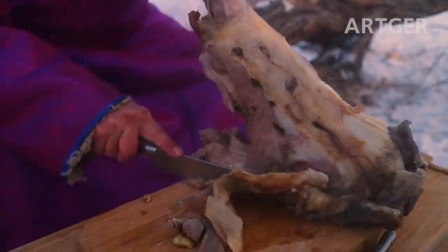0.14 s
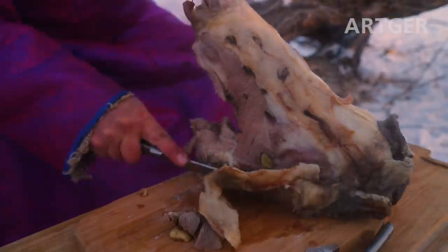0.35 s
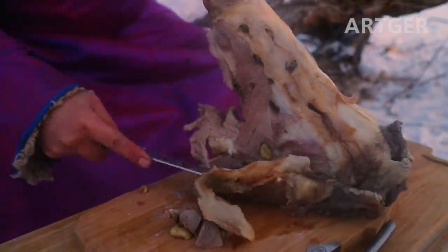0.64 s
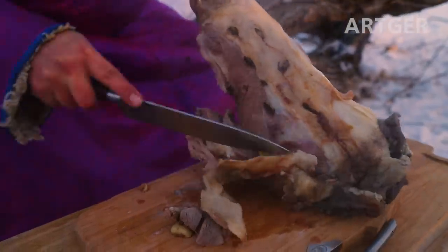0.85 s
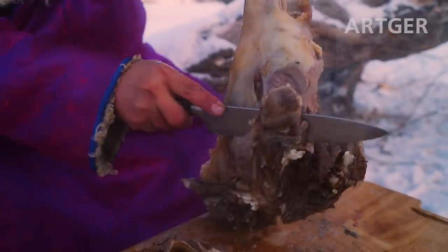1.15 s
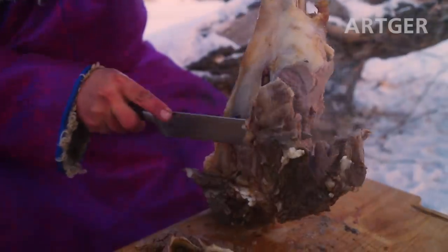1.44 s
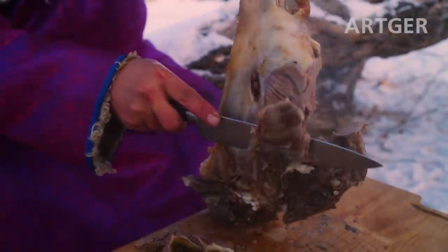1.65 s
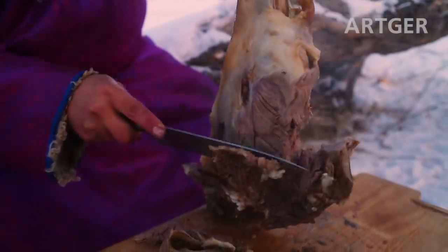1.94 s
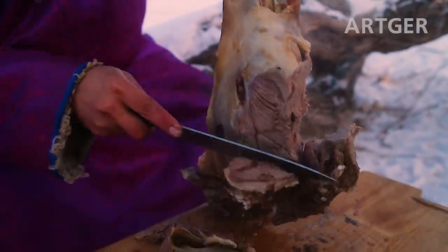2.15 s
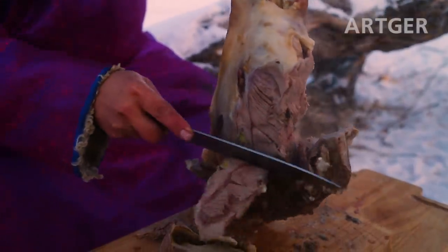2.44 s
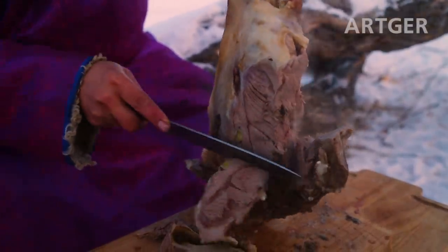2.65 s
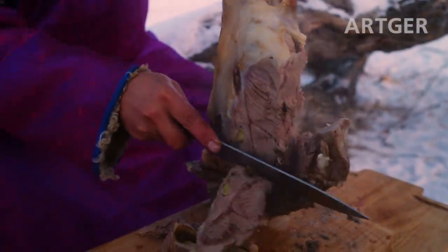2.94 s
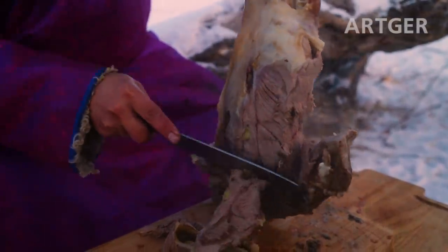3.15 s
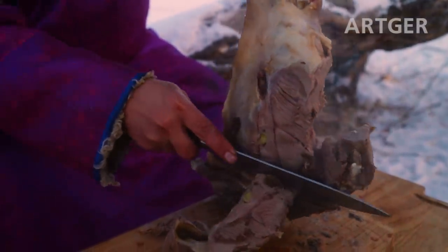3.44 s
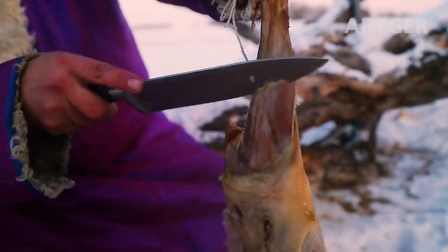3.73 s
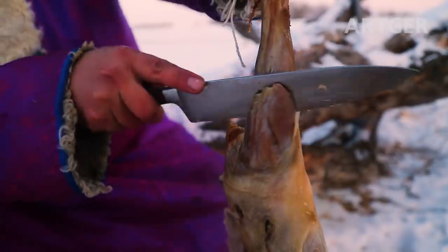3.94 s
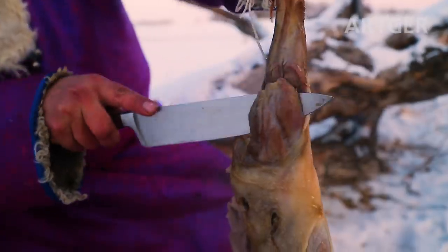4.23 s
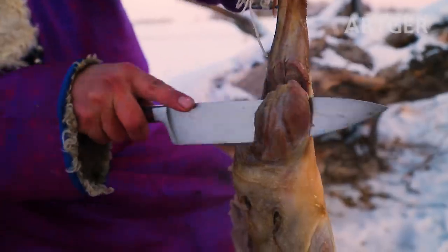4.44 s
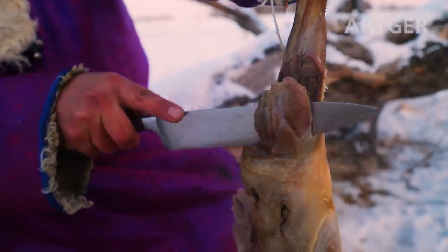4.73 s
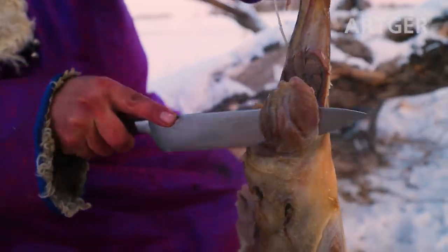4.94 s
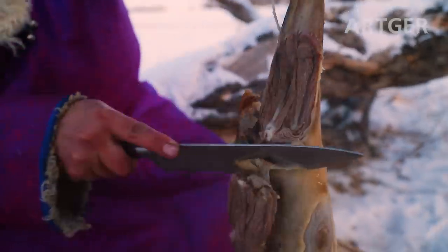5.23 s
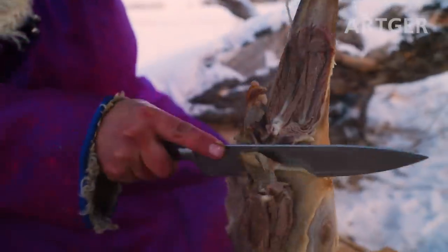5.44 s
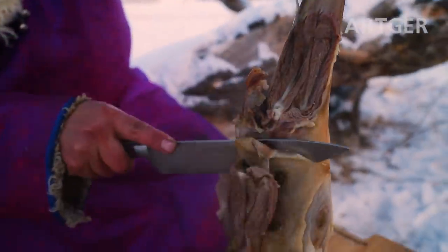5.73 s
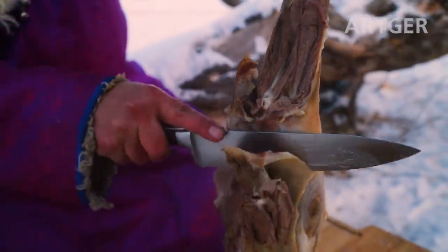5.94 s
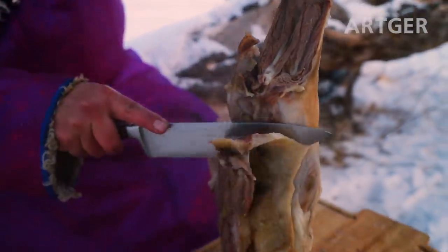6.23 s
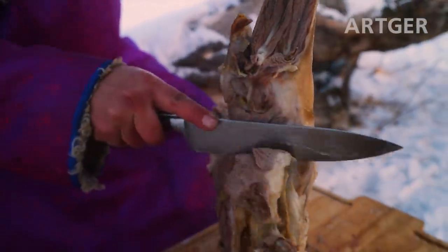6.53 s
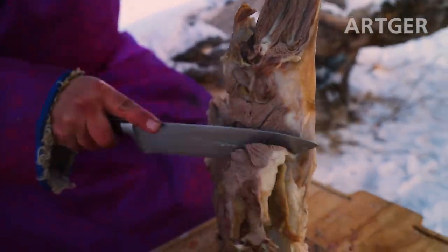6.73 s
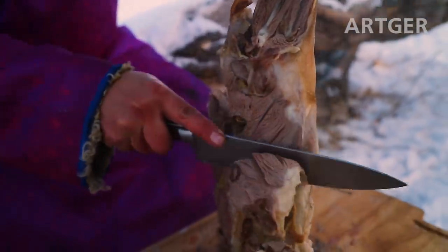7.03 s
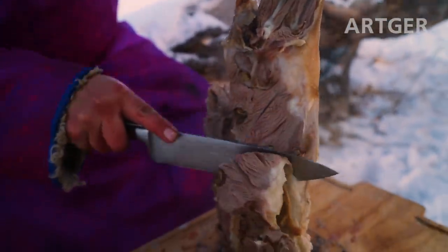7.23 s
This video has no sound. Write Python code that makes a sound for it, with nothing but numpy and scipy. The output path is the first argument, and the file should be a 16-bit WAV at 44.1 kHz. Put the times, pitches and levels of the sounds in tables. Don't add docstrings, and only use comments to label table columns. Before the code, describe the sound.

Outdoors, close stereo microphone, still open air with faint hiss and low wind buffeting that moves unevenly between the sides. From 0 to 0.75 s a knife saws the thick end of a bone; hissing strokes and tearing fibres mix with hollow, rough squeaks on bare bone. Sawing continues at three to four strokes a second, with brief halts and bites. From 1.2 to 1.75 s a magpie, farther off at right, rattles seven harsh notes with a short echo. A wet pop at 2.26 s and a wind thump at 2.3 s precede dense ticks, crunches and a light knock around 2.7-3.6 s. Then strokes down the thin end carry bright nicks and faint thin steel singing. The magpie gives six notes at 4.4-4.9 s. A sharp knock comes at 5.33 s, a duller one at 6.25 s; stronger, crisp slicing strokes alternate with softer ones, snapping fibres until 7.4 s.

```python
import sys
import numpy as np
from scipy import signal
from scipy.fft import rfft, irfft, next_fast_len
from scipy.io import wavfile
from scipy.ndimage import uniform_filter1d, map_coordinates

SR = 44100
rng = np.random.default_rng(int(sys.argv[2]) if len(sys.argv) > 2 else 0)


def voltage_ratio(decibels):
    exponent = np.asarray(decibels, float) / 20
    return 10 ** exponent


def unload_audio(sound):
    columns = np.transpose(np.atleast_2d(sound))
    steps = np.round(np.clip(columns, -1, 1) * 32767)
    wavfile.write(sys.argv[1], SR, steps.astype(np.int16))


N = 325030
T = np.arange(N) / SR
COARSE = T[::32]

# time in seconds, level in dB.
PUSH_DB = [(0, -53), (.6, -57), (.74, -49.5), (.88, -60.5), (1.12, -50.5), (1.39, -70), (1.52, -50.5),
           (2.2, -54.5), (2.34, -41), (2.5, -46.5), (2.87, -60.5), (3.28, -50.5), (3.53, -63), (3.78, -51),
           (5, -53), (5.34, -57), (5.58, -47), (5.93, -65)]
# frequency in Hz, density in dB per Hz.
PUSH_SPECTRUM = [(4, -14), (10, 9.5), (20, 10.5), (45, -0.5), (85, -33), (160, -27), (300, -76)]
# centre in seconds, flutter in dB.
EDDIES = [(0.02, -48), (.4, -55), (.75, -51.5), (1.09, -62), (1.9, -55), (2.34, -52.5), (4.99, -59),
          (5.95, -70), (6.25, -46), (6.4, -50.5), (7.37, -50.5)]
# frequency in Hz, density in dB per Hz.
FLUTTER_SPECTRUM = [(35, -5), (60, 10), (90, 1), (140, -3.5), (250, -26.5)]
# time in seconds, level in dB.
SWAY_DB = [(0, -33), (1.4, -32), (1.8, -29), (2.3, -28.5), (3.6, -34.5), (4, -26.5), (4.8, -29),
           (5.6, -31.5), (6.6, -29), (7.37, -28.5)]
# frequency in Hz, density in dB per Hz.
SWAY_SPECTRUM = [(3, 9.5), (8, 10.5), (13, 12), (22, -25), (45, -11.5), (90, -28.5), (200, -54)]
# start in seconds, level in dB, frequency in Hz.
JOLTS = [(0.029, -23, 40), (.45, -33, 34.9), (0.74, -37, 70), (0.851, -40, 60), (1.068, -37, 60.4),
         (1.951, -33, 55.3), (2.323, -12.5, 36.7), (2.357, -21, 30.2), (2.65, -38, 50), (2.882, -38, 70),
         (3.11, -34, 50), (3.239, -30, 50), (3.757, -33.5, 90.5), (5.621, -33, 50), (6.245, -26, 200),
         (7.31, -50, 90)]
# frequency in Hz, density in dB per Hz.
AIR_SPECTRUM = [(88, -8), (165, 7.5), (280, 10), (1470, -0.5), (2640, -5.5), (6480, -15), (9760, -31),
                (15000, -30)]

# start in seconds, share of the stroke before top speed,
# hiss in dB, tearing in dB over hiss, rubbing in dB over hiss.
THICK_STROKES = [(-.08, 0.67, -47, -2.5, -3), (.24, 0.69, -50, 0.5, -0.5), (.41, 0.15, -58, 3.5, 1),
                 (.68, 0.41, -57.5, 1.5, 0), (.95, 0.36, -52, -3, -4), (1.23, 0.72, -52.5, -1, -8),
                 (1.5, 0.49, -50, -1, -6), (1.85, 0.62, -54.5, -2.5, -4.5), (2.12, 0.4, -50, -5.5, -7),
                 (2.43, 0.67, -53.5, -2.5, -2.5), (2.71, 0.67, -47, -5, -4.5),
                 (3.02, 0.53, -50.5, -5, -2.5), (3.27, 0.25, -52, -5.5, -4.5)]
THIN_STROKES = [(3.6, 0.73, -53, -5.5, -3), (3.751, 0.68, -49, -7, -8.5), (4.06, 0.21, -54.5, -9.5, -8.5),
                (4.34, 0.95, -51.5, 0.5, -7.5), (4.69, 0.63, -50, -1.5, -25), (4.95, 0.79, -54.5, -2.5, -3),
                (5.289, 0.5, -43, -8, -10.5), (5.53, 0.23, -54, -4, -3.5), (5.8, 0.68, -41.5, -10, -13),
                (6.089, 0.42, -53.5, -5.5, -6.5), (6.342, 0.51, -38.5, -12, -13.5),
                (6.599, 0.48, -48.5, -9.5, -7.5), (6.881, 0.58, -42, -9, -9.5),
                (7.173, 0.4, -51.5, -4.5, -4)]
# hiss, tearing, rubbing in dB.
RESTING_DB = (-65.5, -68, -81)
SPEED_EXPONENTS = (1.02, 0.84, 0.76)
# bite in seconds, halt length in seconds, depth in dB.
TURNS = [(1.007, 0.078, 7.5), (2.434, 0.016, 14), (3.66, 0.097, 4.5), (3.05, 0.052, 4), (4.036, 0.028, 6),
         (4.08, .02, -1), (3.789, 0.012, 4), (4.366, 0.016, 9), (4.715, 0.042, -3), (4.962, 0.024, 0),
         (5.311, 0.017, -4), (6.092, 0.023, 1), (6.39, 0.022, 6), (6.629, 0.022, 1), (6.9, 0.045, -1)]
# frequency in Hz, density in dB per Hz.
HISS_SPECTRUM = [(2940, -13.5), (5000, -9), (6590, -4.5), (9160, 1.5), (10500, 1.5), (13700, -7.5),
                 (14900, -7), (15900, -26)]
# frequency in Hz, density in dB per Hz.
TEAR_SPECTRUM = [(700, -11), (1200, -3), (2000, 0.5), (3000, 1), (4500, -2), (6500, -6), (9000, -11.5)]
# frequency in Hz, density in dB per Hz.
RUB_SPECTRUM = [(90, 3), (160, -10.5), (250, -5.5), (450, -3), (800, -3.5), (1300, -10), (2500, -31)]
# frequency in Hz, left-right likeness from 0 to 1.
ALIKE = [(200, 0.63), (600, 1), (2000, 1), (5000, 0.78), (9000, 0.91), (14000, 0.62)]

# start in seconds, length in seconds, share before top speed,
# hollow ring in dB, squeak in dB.
SCRAPES = [
    (-.03, 0.27, 0.77, -40.5, -42),
    (0.231, 0.19, 0.54, -42.5, -39.5),
    (0.427, 0.1, 0.47, -61, -45.5),
    (0.56, 0.12, 0.53, -61, -46),
    (0.67, 0.076, 0.48, -62, -45),
]
# frequency in Hz, width in Hz, level in dB.
BONE_MODES = [(770, 58, -2), (1160, 180, 3.5), (1450, 330, 5.5), (1900, 1400, -1)]
# time in seconds, frequency in Hz.
HOLLOW_HZ = [(0, 950), (.09, 1100), (.16, 1200), (.22, 1550), (.28, 1280), (.335, 1100), (.385, 1550)]
# time in seconds, frequency in Hz.
SQUEAK_HZ = [(0, 1970), (.2, 2200), (.284, 2375), (.354, 2210), (.455, 2330), (.505, 1450), (.6, 2390),
             (.66, 2420), (.708, 2750)]

# start in seconds, peak in dB, frequency in Hz.
STRANDS = [(.0125, -27, 4200), (0.126, -30, 3300), (0.159, -30, 1190), (0.181, -29, 1500),
           (0.294, -33, 2300), (.419, -37, 3000), (1.167, -37, 2200), (2.7318, -31, 10300),
           (2.7777, -41, 6000), (2.83, -30, 10000), (2.8885, -25, 10300), (2.8985, -30, 8450),
           (2.9065, -31, 11000), (2.977, -26, 3980), (2.993, -38, 4480), (3.011, -39, 11000),
           (3.0495, -37, 9340), (3.3075, -30, 8450), (3.408, -24, 3150), (3.4145, -23, 10200),
           (3.4172, -29, 3450), (3.456, -35, 2460), (3.4915, -37, 9800), (3.502, -36, 8460),
           (3.514, -49, 9050), (3.544, -43, 6000), (3.55, -39, 5600), (3.563, -37, 6000),
           (3.569, -33, 11500), (3.604, -43, 7000), (3.6773, -26, 9100), (3.757, -39, 6040),
           (3.909, -34, 4160), (3.938, -26, 5030), (3.952, -30, 8000), (3.971, -29, 4370),
           (3.978, -33, 9000), (4.0805, -33, 3600), (4.13, -34, 7500), (4.203, -29, 12000),
           (4.255, -33, 11100), (4.268, -39, 9500), (4.285, -42, 12000), (4.533, -27, 9000),
           (4.657, -28, 13000), (4.8547, -38.5, 9420), (5.3206, -29.5, 2500), (5.3352, -28, 2240),
           (5.3892, -29, 3340), (5.392, -29, 11100), (5.416, -28, 8500), (5.438, -30, 1800),
           (5.6614, -40, 9850), (5.8654, -45, 9630), (6.1614, -31, 10000), (6.4057, -26, 10000),
           (6.455, -29, 2600), (6.7184, -42, 9210), (7.2123, -39, 10100)]
# start in seconds, peak in dB, frequency in Hz.
PITCHED_CRACKS = [(0.182, -25.5, 4550), (0.757, -30, 5500), (0.839, -30.5, 5700), (1.5873, -42, 3030),
                  (1.61, -44, 3260), (3.4072, -31, 9600), (3.525, -36, 6030), (3.9665, -23, 7400),
                  (3.994, -36, 6050), (4.0366, -30.5, 6660), (4.126, -31, 6650), (4.4685, -41, 2980),
                  (4.509, -29, 7140), (4.522, -23, 9050), (4.6187, -28, 4860), (4.632, -25, 8100),
                  (5.3078, -38, 3550), (5.5994, -26, 4640), (6.391, -31, 8250), (6.851, -31, 9700),
                  (6.927, -29, 11500), (4.47, -29, 9300), (4.557, -34, 9500), (4.366, -46, 9000), (4.669, -37, 9800),
                  (6.616, -39.5, 9700), (5.101, -32, 9000), (5.2378, -34, 9000), (5.0717, -41, 10800),
                  (4.029, -45, 6000), (4.672, -31, 8000), (3.695, -34, 11000), (6.008, -24, 9500), (6.02, -23, 6000),
                  (6.47, -26, 10500), (6.505, -27, 10400), (6.518, -30, 11500), (7.02, -26, 10400),
                  (5.8434, -45, 10800), (6.1175, -38.5, 4000), (0.89, -42, 6000), (2.852, -26, 6060)]
# start in seconds, peak in dB, dull part in dB.
SNAPS = [(0.9916, -41, -16), (1.0112, -35, 2), (1.1153, -29, 0), (1.88, -30, -19), (2.435, -30, -2),
         (2.5251, -27, -27), (2.884, -27, -19), (2.9022, -21, -14), (3.381, -28, -30), (3.6624, -31.5, -37),
         (3.7895, -37, 8), (3.9345, -24, 5.5), (4.331, -36.5, 0), (4.4456, -27, -16), (4.835, -30, -11),
         (5.091, -34, 2), (5.315, -37, -2), (5.3427, -26, 4), (5.389, -27, -27), (5.891, -29, 5),
         (5.9764, -25, -25), (6.095, -29.5, -26), (6.5724, -27, -38), (6.6298, -24.5, -37),
         (6.77, -32, -28), (6.8999, -28, -30), (6.9563, -23, -35), (7.0504, -25.5, -18), (7.0953, -23, -22),
         (7.291, -26, -19)]
# start in seconds, peak in dB, frequency in Hz, T60 in seconds.
POPS = [
    (0.4554, -27, 2750, 0.019),
    (0.4868, -26, 4140, 0.016),
    (2.263, -21.5, 3150, 0.01),
    (2.7424, -35, 3200, 0.023),
    (6.0627, -31.5, 1850, 0.023),
    (6.6897, -26, 1690, 0.013),
]
# start in seconds, level in dB, frequency in Hz.
BUMPS = [
    (3.411, -33, 900),
    (5.332, -25, 1150),
    (5.34, -50, 913),
    (6.2449, -25, 453),
    (6.248, -26, 225),
    (6.2541, -27, 300),
    (6.2583, -27, 556),
]
# centre in seconds, level in dB, frequency in Hz, length in seconds.
CRUNCHES = [(2.436, -46.5, 4200, 0.0072), (2.847, -43.5, 3990, 0.0081), (2.993, -49, 4570, 0.0059),
            (3.413, -41.5, 3100, 0.034), (2.958, -45, 3000, 0.034), (3.417, -43, 1014, 0.017),
            (3.415, -43.5, 11000, .025), (4.8, -48, 4300, 0.025), (4.112, -49, 3900, 0.03),
            (0.43, -52, 2600, .025), (0.7, -49, 3000, 0.028), (0.56, -43.5, 5100, 0.0039),
            (0.881, -47, 5300, 0.0031), (5.602, -38.5, 3300, 0.0091), (5.695, -38, 2700, 0.0041),
            (3.375, -55, 3400, 0.024), (3.8, -49, 3000, 0.044), (3.7, -44, 5500, .02),
            (4.135, -48.5, 6500, .02), (2.7, -43, 3200, .03)]

# centre in seconds, half length in ms, level in dB.
CHATTER = [(1.188, 10.4, -34.5), (1.264, 17.8, -34.5), (1.338, 13, -33), (1.417, 17.4, -33.5),
           (1.512, 15.5, -32.5), (1.61, 18, -33), (1.727, 16, -32), (4.412, 13.7, -36.5),
           (4.479, 19.5, -37.5), (4.562, 14, -35.5), (4.649, 13.3, -34), (4.757, 20.4, -35),
           (4.869, 15.5, -33.5)]
# frequency in Hz, width in Hz, level in dB.
THROAT_MODES = [(2200, 430, 0), (1800, 930, 0), (2750, 490, 0)]
# frequency in Hz, width in Hz, level in dB.
CHEST_MODES = [(1340, 770, -3), (1680, 75, 1.5)]
# time in seconds, frequency in Hz.
RASP_HZ = [(1.17, 6620), (1.75, 4950), (4.39, 6480), (4.9, 5000)]

# start in seconds, length in seconds, share before top speed, level in dB.
GLIDES = [
    (3.787, .13, .15, -52),
    (4.73, 0.2, .8, -52),
    (4.96, 0.07, 0.92, -55),
    (6.614, .25, 0.61, -52),
]
# frequency in Hz, width in Hz, level in dB.
BLADE_MODES = [(9650, 450, 1.5), (10800, 400, 1.5), (12250, 300, 3), (13600, 300, 1), (15000, 350, -1)]

# frequency in Hz, T60 in seconds.
YARD_T60_S = [(800, 0.15), (1800, 0.63), (3000, 0.96), (6000, 0.18)]
# frequency in Hz, phase in radians.
LEAD_RAD = [(300, 0.077), (1100, 0.44), (4500, 0.45), (6500, 1.2), (9700, 0.58), (13500, 1.13)]


def unit(x):
    return x / np.sqrt(np.mean(x ** 2) + 1e-20)


def along(points, hz):
    f, v = np.transpose(points)
    return np.interp(np.log(hz + 1), np.log(f + 1), v)


def curve(rows):
    s, value = np.transpose(rows)
    return np.interp(T, s, value)


def fine(slow):
    return np.interp(T, COARSE, slow)


def wobble(rate_hz):
    some = T[::8]
    knots = rng.standard_normal(int(N * rate_hz / SR) + 4)
    return np.interp(T, some, map_coordinates(knots, [some * rate_hz]))


def filtered(x, response):
    m = next_fast_len(N + SR // 2)
    return irfft(rfft(x, m) * response(np.fft.rfftfreq(m, 1 / SR)), m)[..., :N]


def coloured(x, spectrum):
    return unit(filtered(x, lambda hz: voltage_ratio(along(spectrum, hz))))


def resonances(modes):
    def response(f):
        total = 0
        for k, (hz, width_hz, db) in enumerate(modes):
            damping = 1j * f * width_hz
            total = total + (-1) ** k * voltage_ratio(db) * damping / (hz * hz - f * f + damping)
        return total
    return response


def tone(hz_rows):
    return np.sin(2 * np.pi * np.cumsum(curve(hz_rows)) / SR)


def swing(t, hz):
    return np.sin(2 * np.pi * hz * t) * np.exp(-(t * hz / 0.74) ** 4) * (1 - np.exp(-(t * hz / 0.24) ** 2))


def speed(start_s, length_s, rise):
    u, rise = (COARSE - start_s) / length_s, np.clip(rise, .05, .95)
    return np.sin(np.pi / 2 * np.minimum(u / rise, (1 - u) / (1 - rise)).clip(0, 1))


def grit(per_s, spread_db, share):
    slips = (rng.random(N) < per_s / SR) * voltage_ratio(spread_db * np.minimum(rng.exponential(size=N), 3))
    slips = signal.lfilter([1], [1, -.95], slips) * rng.standard_normal(N)
    return np.sqrt(share) * unit(slips) + np.sqrt(1 - share) * rng.standard_normal(N)


def patchy(x, depth_db):
    z = signal.stft(x, nperseg=256)[2]
    field = uniform_filter1d(rng.standard_normal(z.shape), size=7, axis=0)
    field = uniform_filter1d(field, size=10, axis=1)
    return signal.istft(z * voltage_ratio(depth_db * unit(field)), nperseg=256)[1][:N]


def spread(force, spectrum, alike=ALIKE):
    def response(hz):
        turn = np.arccos(np.clip(along(alike, hz), -1, 1)) / 2
        return voltage_ratio(along(spectrum, hz)) * [np.cos(turn), np.sin(turn)]

    pair = np.array([force, force * np.sign(rng.standard_normal(N))])
    mid, side = filtered(pair, response)
    return np.array([mid + side, mid - side]) / np.sqrt(np.mean(mid ** 2))


def add(track, s, sound):
    part = track[round(s * SR):][:len(sound)]
    part += sound[:len(part)]


def wind():
    eddy_s, calm_db = 0.034, -64
    flaps = voltage_ratio(calm_db) + sum(voltage_ratio(db) * np.exp(-((COARSE - s) / eddy_s) ** 2) for s, db in EDDIES)
    flaps = fine(flaps)
    jolts = np.zeros(N)
    for s, db, hz in JOLTS:
        add(jolts, s, voltage_ratio(db) * swing(T[:SR // 8], hz))
    sway = voltage_ratio(curve(SWAY_DB) - 3 + wobble(2.5)) * coloured(rng.standard_normal(N), SWAY_SPECTRUM)
    opposed = jolts + voltage_ratio(-1.5) * flaps * coloured(rng.standard_normal(N), FLUTTER_SPECTRUM)
    push = voltage_ratio(curve(PUSH_DB) + 2.5) * coloured(rng.standard_normal(N), PUSH_SPECTRUM)
    flutter = flaps * voltage_ratio(2.4 * wobble(13)) * coloured(rng.standard_normal(N), FLUTTER_SPECTRUM)
    return push + flutter + opposed * [[1.2], [-.85]] + sway * [[.9], [-1.15]]


def air():
    return voltage_ratio(-62.5) * spread(rng.standard_normal(N), AIR_SPECTRUM, alike=[(200, 0.53), (8000, 0.067)])


def halts():
    dip_db = 0
    for s, halt_s, db in TURNS:
        dip_db = dip_db + db * (COARSE < s) * np.exp(-((COARSE - s) / halt_s) ** 4)
    return fine(voltage_ratio(-dip_db))


def strokes():
    last_stop_s = 7.43
    hard_db = 18.5
    rows = THICK_STROKES + THIN_STROKES
    stops_s = [row[0] for row in rows[1:]] + [last_stop_s]
    power = [voltage_ratio(2 * db) + 0 * COARSE for db in RESTING_DB]
    for (s, rise, db, tear_db, rub_db), stop_s in zip(rows, stops_s):
        v = speed(s, stop_s - s, rise)
        hardness = (db - RESTING_DB[0]) / hard_db
        for i, over_db in enumerate((0, tear_db, rub_db)):
            level = voltage_ratio(db + over_db) * v ** abs(SPEED_EXPONENTS[i] * hardness)
            power[i] = power[i] + level ** 2
    hissing, tearing, rubbing = (fine(np.sqrt(p)) for p in power)
    catch = 0.5 * wobble(35) + 1.28 * wobble(110)
    hiss = spread(patchy(grit(900, spread_db=3.0, share=0.51), depth_db=2.4), HISS_SPECTRUM)
    tear = spread(patchy(grit(550, spread_db=-1, share=0.18), depth_db=2.0), TEAR_SPECTRUM)
    rub = spread(grit(400, spread_db=2.0, share=0.15), RUB_SPECTRUM)
    hiss = hissing * voltage_ratio(catch) * hiss
    tear = tearing * voltage_ratio(3.0 + 1.2 * catch) * tear
    rub = rubbing * voltage_ratio(1.16 * catch + 1.93 * wobble(25)) * rub
    return hiss + tear + rub


def bone():
    ringing = squeaking = 0 * COARSE
    for s, length_s, rise, ring_db, squeak_db in SCRAPES:
        v = speed(s, length_s, rise)
        ringing = ringing + voltage_ratio(ring_db) * v ** 3.7
        squeaking = squeaking + voltage_ratio(squeak_db) * v ** 1.8
    force = grit(600, spread_db=-3.0, share=0.11) * voltage_ratio(1.5 * wobble(72.6))
    modes = resonances(BONE_MODES)
    hollow = filtered(force, lambda f: modes(f) / (1 + (600 / (f + 1)) ** 4 + (f / 2600) ** 4))
    rough = filtered(force, lambda f: 1 / (1 + 1j * f / 300) ** 2)
    groan = rough[::-1] * tone(HOLLOW_HZ)
    squeak = rough * tone(SQUEAK_HZ)
    ring = 0.79 * unit(hollow) + 0.7 * unit(groan)
    return fine(ringing) * ring + voltage_ratio(-6.5) * fine(squeaking) * unit(squeak)


def ticks():
    out, t = np.zeros(N), np.arange(SR // 100) / SR
    for s, db, hz in STRANDS:
        t60_s = 0.0021 + 6 / hz
        ragged = 0.79 + 1.7 * uniform_filter1d(rng.standard_normal(len(t)), size=4)
        envelope = voltage_ratio(db + 0.5 - 60 * t / t60_s) * (1 - np.exp(-t / 0.000084))
        add(out, s, envelope * ragged * np.sin(2 * np.pi * hz * t))
    return out


def contacts():
    out, t = np.zeros(N), np.arange(SR // 20) / SR
    cracks = [(s, db, 10400 * np.exp(0.1 * rng.standard_normal()), dull_db) for s, db, dull_db in SNAPS]
    cracks += [(s, db, hz, -19) for s, db, hz in PITCHED_CRACKS]
    for s, db, hz, dull_db in cracks:
        fizz = uniform_filter1d(rng.standard_normal(len(t)), size=6)
        fizz = fizz * np.cos(2 * np.pi * hz * t) * voltage_ratio(-60 * t / 0.008)
        ring = np.sin(2 * np.pi * hz * t) * voltage_ratio(-60 * t / 0.005)
        dull = np.sin(2 * np.pi * 2300 * t) * voltage_ratio(dull_db - 60 * t / 0.002)
        attack = 1 - np.exp(-t / .0001)
        add(out, s, voltage_ratio(db - 0.5) * attack * (1.76 * fizz + 0.9 * ring + dull))
    for s, db, hz, t60_s in POPS:
        rising = np.sin(2 * np.pi * hz * t * (1 + 4 * t))
        add(out, s, voltage_ratio(db - 60 * t / t60_s) * (1 - np.exp(-t / 0.004)) * rising)
    for s, db, hz in BUMPS:
        add(out, s, -voltage_ratio(db) * swing(t, hz))
    return out


def crunches():
    out, t = np.zeros(N), np.arange(SR // 16) / SR
    for s, db, hz, length_s in CRUNCHES:
        grains = uniform_filter1d(rng.standard_normal(len(t)), size=round(SR / hz * 2))
        grain_db = 3.3 * rng.standard_normal(len(t) // 40 + 1).clip(-2, 1)
        grains = grains * voltage_ratio(grain_db).repeat(40)[:len(t)]
        envelope = np.exp(-((t - 1.75 * length_s) / (0.42 * length_s)) ** 2)
        burst = unit(grains * np.sin(2 * np.pi * hz * t)) * envelope
        add(out, s - 1.5 * length_s, voltage_ratio(db) * burst)
    for when, pitch, size in rng.random((260, 3)):
        hz = 3000 + 10500 * pitch
        add(out, when * N / SR, voltage_ratio(-55 + 13.0 * size - 60 * t / 0.00073) * np.sin(2 * np.pi * hz * t))
    return out


def magpie():
    beats = np.cumsum(410 * (1 + .12 * wobble(60) + .1 * wobble(300)) / SR)
    pulses = np.diff(np.floor(beats), prepend=0) * voltage_ratio(1.4 * wobble(350))
    gate = np.exp(-3 * (beats % 1))
    source = 0.91 * unit(pulses) + 0.59 * unit(gate * rng.standard_normal(N))
    source = source * voltage_ratio(0.65 * wobble(120))
    spent = curve([(1.17, 0.044), (1.75, 0.58), (4.39, 0.31), (4.9, 0.69)])

    def ring(modes, low_hz, top_hz):
        response = resonances(modes)
        return unit(filtered(source, lambda f: response(f) / (1 + (low_hz / (f + 1)) ** 8 + (f / top_hz) ** 8)))

    def effort(width):
        level = 0
        for s, half_ms, db in CHATTER:
            level = level + voltage_ratio(db) * np.exp(-np.abs((COARSE - s) / (half_ms * width)) ** 2.24)
        return fine(level)

    early, late = (ring(THROAT_MODES[i:i + 1], 1650, 2000) for i in (0, 1))
    core = voltage_ratio(-2.0) * (np.sqrt(1 - spent) * early - np.sqrt(spent) * late) * effort(0.0016)
    beak = voltage_ratio(-3.5 - 4 * spent) * ring(THROAT_MODES[2:], 1670, 3300) * effort(0.0017)
    chest = voltage_ratio(-11.5 + 4.8 * spent) * ring(CHEST_MODES, 1120, 2140) * effort(0.0017)
    grain = filtered(gate * rng.standard_normal(N), lambda f: 1 / (1 + 1j * f / 800) ** 2)
    grain = grain * voltage_ratio(2.5 * wobble(90))
    rasp = voltage_ratio(-20.5 + 13 * spent) * unit(grain * tone(RASP_HZ)) * effort(0.0022)
    return core + beak + chest + rasp


def singing():
    sliding = fine(sum(voltage_ratio(db) * speed(s, length_s, rise) ** 0.34 for s, length_s, rise, db in GLIDES))
    force = grit(300, spread_db=0.0, share=0.33) * voltage_ratio(2.9 * wobble(60))
    modes = resonances(BLADE_MODES)
    return sliding * unit(filtered(force, lambda f: modes(f) ** 2))


def yard(x):
    hz, _, z = signal.stft(rng.standard_normal((2, SR // 2)), SR, nperseg=256)
    t_s = np.arange(z.shape[-1]) * 128 / SR
    decay = voltage_ratio(-60 * t_s / along(YARD_T60_S, hz)[:, None])
    tail = signal.istft(z * decay, SR, nperseg=256)[1]
    delayed = np.pad(x, (300, 0))[None]
    return signal.fftconvolve(delayed, tail / np.linalg.norm(tail[0]), axes=1)[:, :N]


def scene():
    halting = halts()
    near = bone() + ticks() + contacts() + crunches() + singing()
    knife = halting * strokes() + near
    knife = filtered(knife, lambda hz: np.exp(1j * along(LEAD_RAD, hz) * [[.5], [-.5]]))
    knife = knife * voltage_ratio([[-.8], [.8]]) + voltage_ratio(-19.5) * yard(near)
    bird = magpie()
    late = filtered(bird, lambda hz: np.exp(-2j * np.pi * hz * 0.00011))
    bird = np.array([voltage_ratio(-2) * bird, voltage_ratio(3.0) * late]) + voltage_ratio(-13.5) * yard(bird)
    return wind() + halting ** 0.12 * air() + knife + bird


def roll_off(x):
    return signal.sosfilt(signal.butter(12, 16660, fs=SR, output="sos"), x)


def record(dry):
    mix = filtered(dry, lambda hz: hz < 15850)
    return roll_off(mix)


dry = scene()
out = record(dry)
unload_audio(out)
```